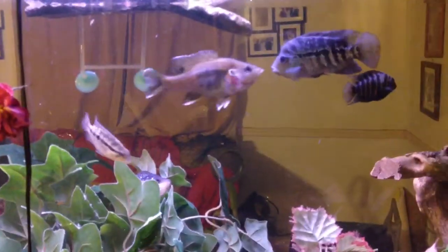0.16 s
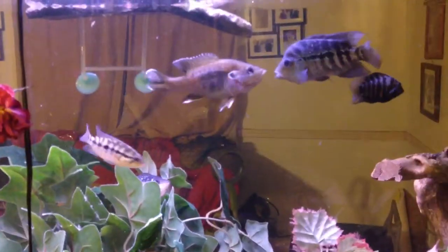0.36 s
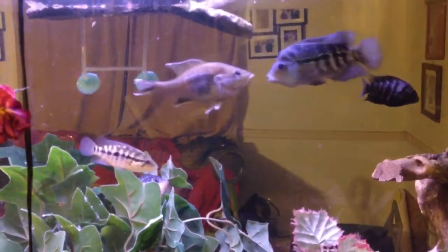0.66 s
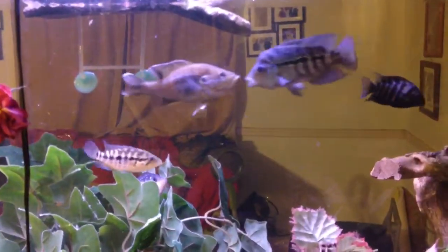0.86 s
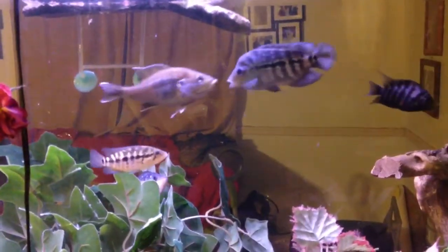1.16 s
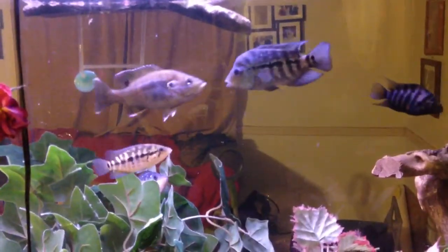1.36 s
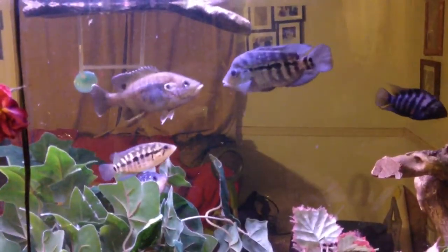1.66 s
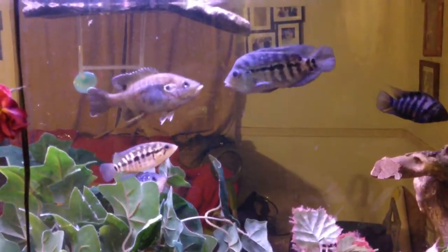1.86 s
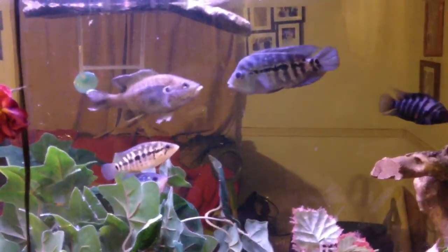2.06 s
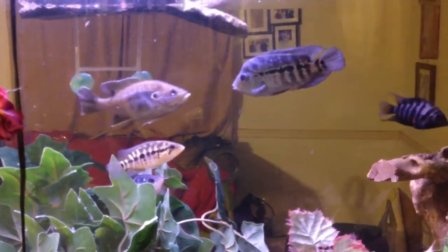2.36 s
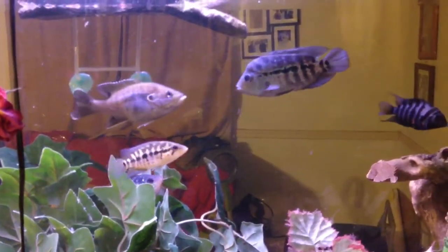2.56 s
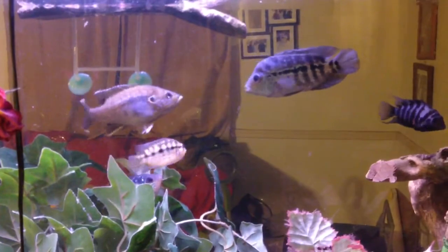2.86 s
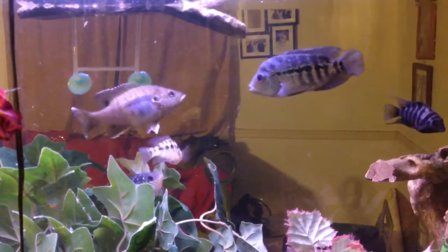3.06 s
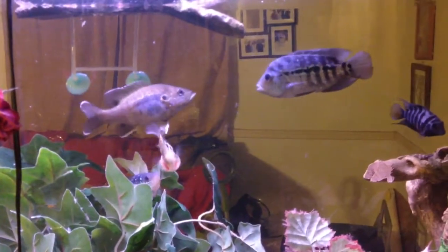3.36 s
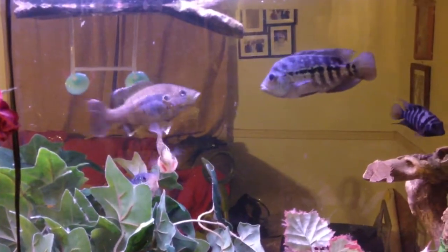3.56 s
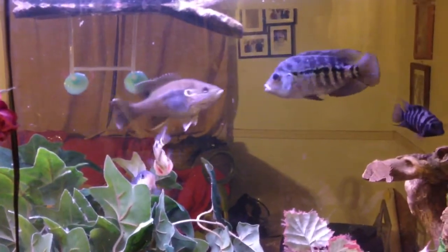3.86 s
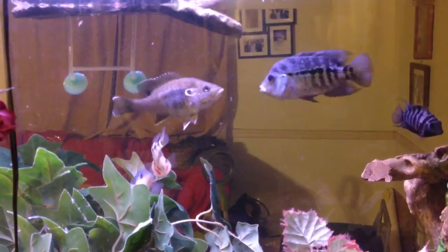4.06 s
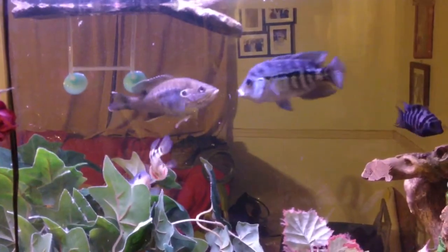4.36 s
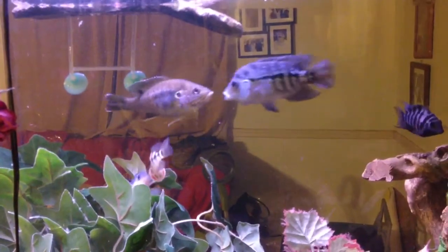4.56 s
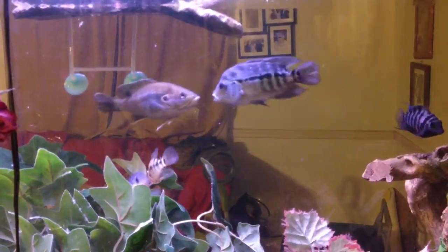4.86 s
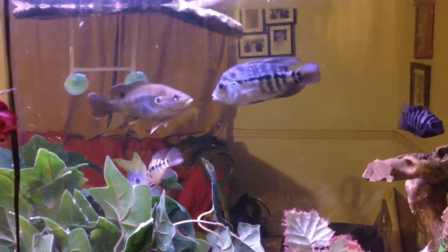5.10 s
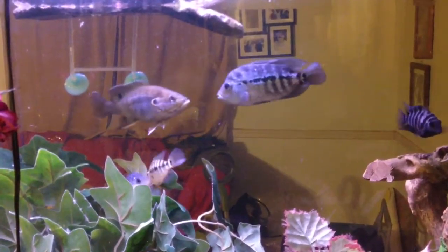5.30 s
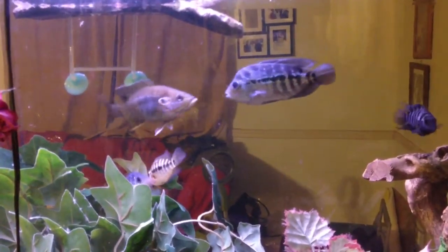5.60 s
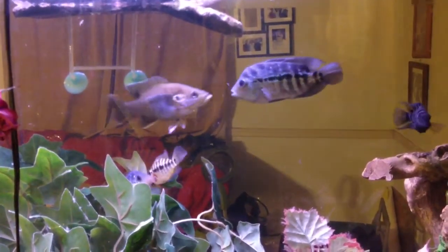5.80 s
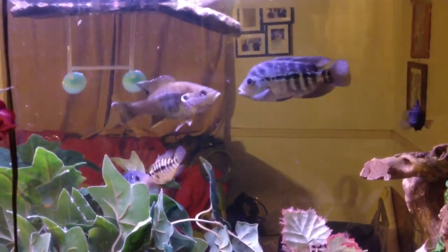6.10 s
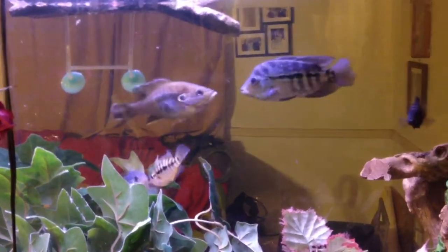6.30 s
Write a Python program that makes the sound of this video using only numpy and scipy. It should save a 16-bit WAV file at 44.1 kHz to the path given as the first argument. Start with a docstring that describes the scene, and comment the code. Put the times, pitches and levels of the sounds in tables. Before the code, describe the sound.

An aquarium trickles throughout, close to a small, bass-thin microphone in a lively room: swarms of tiny ringing bubbles, strongest around 2.4 kHz, uneven plops several times a second, fluttering spray hiss and a faint low pump hum. The flow swells briefly around 0.7 seconds. Light metallic clinks sound at 0.35 and 0.6. At about 1.4 a clink comes with a short, falling board groan; from 1.6 to 2.5 key-like metal clinks, jingles and rattles in quick shoves over a board. Duller scrapes follow at 2.7 to 2.9, and another clink and scrape at 3.35. Then mostly water, with bright droplet ticks, until 5.5, when a heavy clatter bursts out: two woody knocks, hard metallic cracks and rough dragging, strongest from 5.58 to 5.7, settling by 5.9. Water continues with a few faint clinks to the end at 6.4.

```python
"""Aquarium trickle and shuffled metal

Water trickles into a home aquarium: swarms of ringing bubbles, loudest near 2.4 kHz, with louder plops,
hissing spray, noisy droplet ticks and a pump hum. Elsewhere in the room small metal things, keys perhaps,
clink (noise cracks and ringing modes) and rattle (dense tiny contacts) as they are dragged over a board,
once with a heavy clatter. A lively room adds a dying noise tail; a small microphone thins the bass.
"""
import sys
import numpy as np
from scipy import signal
from scipy.fft import rfft, irfft
from scipy.io import wavfile
from scipy.ndimage import uniform_filter1d

SR = 44100
rng = np.random.default_rng(int(sys.argv[2]) if len(sys.argv) > 2 else 0)


def digitize_waveform(pressure):
    """Quantize a signal to 16-bit integers and store it at the path in sys.argv[1].

    Rows of a 2-D input are taken as channels; values are limited to [-1, 1].
    """
    field = np.atleast_2d(pressure).T
    bounded = np.clip(field, -1, 1)
    quanta = np.round(bounded * 32767).astype(np.int16)
    wavfile.write(sys.argv[1], SR, quanta)


N = 284004  # length [samples]


def from_db(db):
    """Gain of a level in dB."""
    return 10 ** (np.asarray(db) / 20)


def rms_one(x):
    """Scale a sound to rms 1."""
    return x / np.sqrt(np.mean(x ** 2) + 1e-20)


def level_curve(rows):
    """Read a (time, level) table at every sample, in dB."""
    times, levels = np.transpose(rows)
    return np.interp(np.arange(N) / SR, times, levels)


def at_hz(points, hz):
    """Read a table of values by frequency on a log-frequency axis."""
    table_hz, values = np.transpose(points)
    return np.interp(np.log(hz), np.log(table_hz), values)


def drift(rate_hz):
    """A slow random curve of rms 1: noise smoothed by two equal low-pass poles at the rate."""
    step = 40  # samples between the points of the curve
    r = np.exp(-2 * np.pi * rate_hz * step / SR)
    noise = rng.standard_normal(N // step + 2002)
    slow = signal.lfilter([1], [1, -2 * r, r * r], noise)[2000:]  # skip the filter's start
    return np.interp(np.arange(N) / step, np.arange(len(slow)), rms_one(slow))


def colour(x, spectrum):
    """Filter causally (minimum phase) with a given spectrum, folding its cepstrum forward in time."""
    gains = from_db(at_hz(spectrum, np.linspace(1, SR / 2, 2049)))
    cepstrum = irfft(np.log(gains))
    cepstrum[1:2048] *= 2
    cepstrum[2049:] = 0
    impulse_response = irfft(np.exp(rfft(cepstrum)))
    return signal.fftconvolve(x, impulse_response)[:N]


def resonance(x, hz, width_hz):
    """A two-pole band-pass with a gain of about 1 on top."""
    r = np.exp(-np.pi * width_hz / SR)
    zeros = np.array([1, 0, -1]) * (1 - r * r) / 2
    poles = [1, -2 * r * np.cos(2 * np.pi * hz / SR), r * r]
    return signal.lfilter(zeros, poles, x)


def grains(per_s, spread_db):
    """Random clicks of either sign; the spread makes their sizes uneven."""
    size_db = spread_db * np.minimum(rng.exponential(1, N), 5)
    clicks = from_db(size_db) * rng.choice([-1, 1], N)
    return clicks * (rng.random(N) < per_s / SR)


def add(out, s, sound):
    """Mix a short sound in at a time."""
    i = int(s * SR)
    out[i:i + len(sound)] += sound[:N - i]


def bubble(hz, cycles, rise, swell_s, roundness=1):
    """A bubble swells quickly, rings down 60 dB in some cycles and glides in pitch."""
    t = np.arange(int(1.5 * cycles / hz * SR)) / SR
    age = t * hz / cycles
    shape = (1 - np.exp(-t / swell_s)) ** 2 * from_db(-60 * age ** roundness)
    return shape / shape.max() * np.sin(2 * np.pi * hz * t * (1 + rise * age))


# how strongly the water runs: (time [s], level [dB])
STREAM_LEVEL = [(0, -44.5), (.66, -38), (1.2, -44.5), (2.55, -41.5), (3.0, -41), (3.6, -42), (3.83, -40.5),
                (4.28, -43), (5.24, -41.5), (6.44, -41.5)]
# loudness of bubbles by pitch: (pitch [Hz], relative level [dB per Hz])
BUBBLE_SPECTRUM = [(290, -72), (500, -76), (734, -12), (976, -10.5), (1240, -2), (1390, -14), (1750, 0.5),
                   (1990, -6.5), (2390, 7.5), (2700, -8.5), (3050, -30), (3510, -17), (4350, -25),
                   (5860, -27), (7470, -21), (10200, -56), (15000, -59)]
SMALL_GLIDE = 0.13  # spread of the pitch glides


def trickle():
    """Bubbles of all sizes are born in clumps where the stream enters; the smallest ring only a few ms."""
    born = grains(3300 * from_db(4.5 * drift(18)), spread_db=4.5)
    pitches = np.geomspace(600, 12000, 70)
    dealt = rng.integers(0, 70, N)  # which pitch a bubble born at each sample gets
    out = np.zeros(N)
    for k, hz in enumerate(pitches):
        cycles = 24.0 if hz < 3300 else 45.0
        glide = 0.028 + SMALL_GLIDE * rng.standard_normal()
        one = rms_one(bubble(hz, cycles, glide, swell_s=9.8 / hz, roundness=0.8))
        one = one * hz / np.sqrt(cycles)
        out += from_db(at_hz(BUBBLE_SPECTRUM, hz)) * signal.fftconvolve(born * (dealt == k), one)[:N]
    return from_db(level_curve(STREAM_LEVEL)) * rms_one(out)


# single bubbles that stand out: (time [s], level [dB], pitch [Hz])
PLOP_EVENTS = [(0.0552, -24, 2260), (0.059, -39, 1247), (.068, -25, 2210), (.152, -27, 1790),
               (0.187, -29, 2470), (0.1978, -22, 2520), (.2249, -17.5, 2390), (.4813, -32, 2200),
               (0.5118, -33, 2640), (.678, -40.5, 723), (0.887, -26.5, 2170), (0.306, -35, 1110),
               (0.332, -30, 1256), (0.3635, -21.5, 2400), (0.354, -38, 1060), (0.426, -37, 1160),
               (0.4282, -24.5, 2600), (0.454, -25, 2180), (.51, -41, 845), (0.56, -39, 990),
               (.63, -41, 1174), (.735, -27.5, 1840), (0.6511, -23, 2330), (.9388, -27, 2300),
               (1.019, -41.5, 1060), (1.039, -28, 2380), (1.193, -27, 1980), (1.2283, -29, 2600),
               (1.2402, -22, 2300), (1.2877, -28, 1850), (1.3072, -24.5, 2360), (1.3508, -18.5, 2300),
               (1.358, -36.5, 1240), (1.39, -39, 1270), (1.568, -33.5, 1060), (1.469, -38, 1190),
               (1.5703, -23, 2140), (1.8918, -33, 1800), (2.517, -47, 1000), (1.678, -31, 896),
               (1.729, -29.5, 1004), (1.953, -27.5, 2500), (2.0056, -23, 2450), (2.168, -18, 2420),
               (2.237, -34, 950), (2.6234, -30, 1990), (2.647, -21, 2350), (2.809, -26.5, 2560),
               (2.874, -24, 2490), (2.975, -22, 2690), (3.0257, -17, 2424), (3.122, -24.5, 2400),
               (3.1401, -24, 2270), (3.339, -20.5, 2870), (3.3625, -25, 2320), (3.3775, -20.5, 2280),
               (3.388, -23, 2320), (3.4013, -28, 2450), (3.4288, -24, 2330), (3.436, -18.5, 2540),
               (3.467, -33.5, 1070), (3.5309, -27, 2260), (3.684, -36.5, 1136), (3.711, -27, 2470),
               (3.768, -35, 1140), (3.8221, -21.5, 2350), (4.056, -26, 2420), (4.111, -24, 2290),
               (4.2076, -34, 1750), (4.229, -26, 2610), (4.365, -28, 2320), (4.42, -37, 2400),
               (4.5, -22, 2400), (4.59, -33, 1550), (4.65, -27.5, 1270), (4.7666, -28.5, 2290),
               (4.767, -41, 1115), (4.8034, -26.5, 2440), (4.9165, -22.5, 2450), (4.835, -26, 2390),
               (4.9034, -25, 2420), (4.969, -27, 2320), (5.115, -25, 2480), (5.1864, -20, 2440),
               (5.239, -32, 3310), (5.252, -22.5, 2380), (5.3374, -28.5, 2280), (5.3568, -26.5, 2450),
               (5.4883, -22.5, 2540), (5.786, -24, 2510), (5.909, -22, 2170), (6.031, -36, 1240),
               (6.0812, -22.5, 2350), (6.129, -24, 2700), (6.2012, -25.5, 2350), (6.26, -34, 3400),
               (6.332, -25, 2290), (6.3824, -26.5, 2350), (6.4243, -28, 2200)]
# ring length by pitch: (pitch [Hz], ring before a random spread [cycles])
PLOP_RING = [(1100, 24), (1800, 21)]
# attack by pitch: (pitch [Hz], swell time constant [s])
PLOP_SWELL = [(1100, 0.0008), (2300, 0.0011)]
PLOP_ROUND, PLOP_GLIDE = 1.9, 0.08  # over 1 a bubble holds, then dies quickly; spread of the pitch glides
PLOP_SPLASH_DB = -6.5  # before the splash is band-passed


def loud_bubbles():
    """Single bubbles, the deep ones ringing longer, with a splash from the drop and a near-wall echo."""
    out, splash = np.zeros(N), np.zeros(N)
    for s, db, hz in PLOP_EVENTS:
        cycles = at_hz(PLOP_RING, hz) * 2 ** (0.13 * rng.standard_normal())
        glide = PLOP_GLIDE * rng.standard_normal()
        one = from_db(db) * bubble(hz, cycles, glide, at_hz(PLOP_SWELL, hz), PLOP_ROUND)
        add(out, s, one)
        add(splash, s, np.abs(one) * rng.standard_normal(len(one)))
    splash_band = signal.butter(2, [800, 3600], "band", fs=SR, output="sos")
    out += from_db(PLOP_SPLASH_DB) * signal.sosfilt(splash_band, splash)
    add(out, .005, from_db(-8) * out.copy())  # the wall's echo
    return out


def spray():
    """Droplets too fine to ring alone fall in flurries: a hiss that comes and goes many times a second."""
    flurries = from_db(7.8 * drift(44) + 2.0 * drift(13.0))
    hiss = colour(rng.standard_normal(N), BUBBLE_SPECTRUM)
    return from_db(level_curve(STREAM_LEVEL) - 6.5) * rms_one(flurries * hiss)


# droplets that tick on the surface: (time [s], relative level [dB], pitch [Hz])
TICK_EVENTS = [(2.68, -30, 7400), (2.768, -32, 8800), (3.1963, -27.5, 7940), (3.2455, -36, 11900),
               (3.27, -37, 9400), (3.444, -30, 9200), (3.5604, -28.5, 4360), (3.6285, -27.5, 7750),
               (3.636, -35, 3700), (3.66, -34, 7200), (3.7065, -28.5, 7560), (3.734, -32, 5440),
               (3.774, -32, 7400), (3.7867, -25, 6750), (3.82, -37, 6900), (3.878, -37, 6000),
               (3.9, -40, 5400), (4.0249, -33, 7800), (4.228, -41.5, 7500), (4.309, -31.5, 7160),
               (4.7316, -29, 6760), (4.7886, -32, 7900), (4.801, -22.5, 4170), (4.894, -31, 7920),
               (4.916, -45, 9500), (5.06, -33, 7760), (5.335, -40, 11500), (5.247, -29.5, 7300),
               (5.358, -37, 8550), (5.4, -36, 8050), (5.448, -33, 3990), (6.0198, -34, 7910)]
TICK_RISE_S, TICK_T60_S, TICK_BROAD_DB = 0.0021, 0.028, -17.5
FAINT_TICKS = 110  # barely heard droplets at random times
FAINT_DB, FAINT_SPREAD_DB = -40, -3


def ticks():
    """Fine droplets hit the surface: short puffs of bright noise, strongest round each droplet's pitch."""
    out, t = np.zeros(N), np.arange(SR // 25) / SR
    luck = rng.random((FAINT_TICKS, 3))
    faint = [(a * N / SR, FAINT_DB + FAINT_SPREAD_DB * b, 4000 * 3.02 ** c) for a, b, c in luck]
    for s, db, hz in TICK_EVENTS + faint:
        envelope = (1 - np.exp(-t / TICK_RISE_S)) * from_db(-60 * t / TICK_T60_S)
        puff = rng.standard_normal(len(t)) * envelope
        broad = np.diff(puff, prepend=0) * from_db(TICK_BROAD_DB)
        pitched = resonance(puff, hz, width_hz=650) * from_db(8.5)
        add(out, s, from_db(db) * (broad + pitched))
    return signal.sosfilt(signal.butter(2, [3200, 12500], "band", fs=SR, output="sos"), out)


# metal on metal: (time [s], relative level [dB], favoured mode [Hz], ring over crack [dB])
CLINK_EVENTS = [(0.3452, -22, 4330, -3.5), (0.6062, -22.5, 5200, -5), (1.3698, -23.5, 7560, -7.5),
                (1.5861, -16, 7060, 0), (1.59, -30.5, 8410, 7), (1.585, -39.5, 12580, 23),
                (1.6469, -19.5, 7600, 1.5), (1.804, -20.5, 4080, -19), (1.943, -28, 14000, 0),
                (2.013, -21, 8100, 1), (2.035, -17, 7840, -4.5), (2.1078, -17.5, 4695, -1.5),
                (2.12, -27, 4800, 8), (2.132, -25, 4695, -4), (2.2477, -28, 7800, 1),
                (2.3283, -19.5, 9450, -1), (2.44, -24.5, 7200, -5), (2.26, -32, 4690, -1.5),
                (2.722, -28.5, 5000, -12), (2.919, -31.5, 4690, -7), (2.801, -21.5, 4500, -10),
                (3.12, -35.5, 4600, 1.5), (3.359, -20, 4600, -7.5), (3.37, -23.5, 5400, 4.5),
                (5.523, -26, 4730, 15), (5.534, -30, 4700, 8), (5.5531, -34, 4700, 13),
                (5.575, -8, 4700, -10.5), (5.586, -30, 4630, 9), (5.6272, -14.5, 5200, -8),
                (5.6721, -9.5, 4520, -15), (5.799, -23, 5170, -9), (6.0462, -32, 9100, -6),
                (6.0985, -31, 7700, -8), (6.278, -23, 7600, -0.5)]
# what the metal rings with: (mode [Hz], relative level [dB])
METAL_MODES = [(4250, -8.5), (4520, -5), (4600, -2.5), (4695, -2), (4790, -9), (5400, -4), (6880, -12),
               (7190, -3), (7830, -6.5), (8410, -1), (8660, -1), (9390, -3.5), (10300, -7), (12580, -14),
               (13400, -25), (13900, -30)]
# colour of cracks and rattle: (frequency [Hz], relative level [dB per Hz])
RATTLE_SPECTRUM = [(710, -55), (1200, -6.5), (1320, -9), (1710, -7.5), (2460, 6.5), (3510, -9.5),
                   (4210, -1.5), (4690, -1.5), (5050, -6), (5450, -0.5), (6190, -6), (7840, -3.5),
                   (11500, -16), (13600, -14.5), (15600, -22)]
# faint cracks are shorter: (clink level [dB], crack T60 [s])
CRACK_T60 = [(-38, .022), (-25, .09)]
CLINK_T60_S, CRACK_RISE_S = 0.1, .004
# the crack's top edge, brighter for pieces that ring higher; its level is for a favoured mode of 7 kHz
SIZZLE_DB, SIZZLE_DB_PER_OCTAVE = -13.5, 8.5


def clinks():
    """A crack of noise and ringing modes near the favoured one; loose contact detunes and wavers them."""
    rings, cracks, edges = np.zeros(N), np.zeros(N), np.zeros(N)
    t = np.arange(SR // 6) / SR
    hz, mode_db = np.transpose(METAL_MODES)
    for s, db, favoured_hz, ring_db in CLINK_EVENTS:
        luck = rng.standard_normal((3, len(hz)))  # detuning, phase and level of each mode
        near_db = -np.minimum(90 * np.abs(np.log2(hz / favoured_hz)), 23.0)
        sines = np.sin(2 * np.pi * (np.outer(t, hz * (1 + 0.00067 * luck[0])) + luck[1]))
        modes = sines @ from_db(mode_db + near_db + 2 * luck[2])
        waver = 1 + .25 * rms_one(uniform_filter1d(rng.standard_normal(len(t)), size=150))
        ring = modes * waver * from_db(ring_db - 60 * t / CLINK_T60_S)
        add(rings, s, from_db(db) * ring * (1 - np.exp(-t / 0.00072)))
        crack_t60_s = np.interp(db, *np.transpose(CRACK_T60))
        crack_shape = from_db(db - 60 * t / crack_t60_s) * (1 - np.exp(-t / CRACK_RISE_S))
        crack = crack_shape * rng.standard_normal(len(t))
        add(cracks, s, crack)
        sizzle_db = SIZZLE_DB + SIZZLE_DB_PER_OCTAVE * np.log2(favoured_hz / 7000)
        add(edges, s, from_db(sizzle_db) * crack)
    return rings + colour(cracks, RATTLE_SPECTRUM) + np.diff(edges, prepend=0)


# each shove of the metal across the board:
# (start [s], hold [s], rattle level [dB], drag level [dB], jingle level [dB])
SHOVE_EVENTS = [(1.351, 0.041, -46, -41.5, -48), (1.571, 0.067, -33, -44.5, -39),
                (1.667, 0.036, -39, -42.5, -54), (1.932, 0.045, -33, -42, -34),
                (1.991, 0.032, -29, -37, -34), (2.09, 0.16, -41, -56, -41), (2.23, 0.051, -34, -41, -38.5),
                (2.34, 0.074, -44.5, -51.5, -50), (2.439, 0.03, -38.5, -57, -43),
                (2.71, 0.15, -45, -39, -71), (2.787, 0.022, -32, -36.5, -68), (2.929, 0.066, -41, -42, -70),
                (3.349, 0.035, -32, -36.5, -65), (5.515, 0.022, -31.5, -30, -63),
                (5.588, 0.046, -32.5, -29.5, -39), (5.642, 0.043, -29.5, -24, -50),
                (5.69, 0.073, -36.5, -52, -41.5), (5.783, 0.038, -29.5, -30, -40),
                (5.855, 0.034, -34, -31, -56)]
SHOVE_RISE_S, RATTLE_FALL_DB_PER_S, DRAG_FALL_DB_PER_S = 0.012, 198, 190


def shoved(level_db, fall_db_per_s):
    """Power of a layer under the shoves: each swells, holds and falls away."""
    out, t = np.zeros(N), np.arange(SR // 2) / SR
    for (s, hold_s, *_), db in zip(SHOVE_EVENTS, level_db):
        after = np.maximum(t - SHOVE_RISE_S - hold_s, 0)
        swell = np.minimum(t / SHOVE_RISE_S, 1) ** 4
        add(out, s, swell * from_db(db - fall_db_per_s * after) ** 2)
    return out


# colour of the drag: (frequency [Hz], relative level [dB per Hz])
DRAG_SPECTRUM = [(35, -55), (60, -33.5), (246, -0.5), (403, -1.5), (439, -0.5), (577, -1.5), (650, -2.5),
                 (1010, 1), (1330, -6), (2410, 3), (3500, -30), (4550, -43), (7700, -120)]
# resonances of the board, also rung by the knocks: (frequency [Hz], width [Hz], relative level [dB])
BOARD_MODES = [(444.4, 6.4, 0), (656, 9.3, -6.5), (751, 22, -3), (1070, 42, -11.5)]
# the faint rustle between shoves, before its trim and drift: (time [s], level [dB])
RUSTLE_LEVEL = [(0, -42), (.22, -50), (.62, -43.5), (.82, -39.5), (1.5, -42), (1.8, -47), (2.6, -53.5),
                (4.2, -55.5), (5.0, -53), (6.44, -52)]
RUMBLE_DB = -50.5  # the board is never quite still
JINGLE_HZ = 8620  # the smallest pieces jingle above this, the rattle stays below


def shuffle():
    """Dense tiny contacts make rattle and jingle; the drag is rough noise in the board's resonances."""
    contacts = colour(grains(6000 * from_db(4.1 * drift(45)), spread_db=0.0), RATTLE_SPECTRUM)
    rub = grains(3000, spread_db=3.0)
    board_ring = sum(from_db(db) * resonance(rub, hz, width_hz) for hz, width_hz, db in BOARD_MODES)
    drag = colour(rub + from_db(4.5) * board_ring, DRAG_SPECTRUM)
    # the pieces ring on, by turns
    metal_ring = sum(from_db(db - 4.0 + 8.4 * drift(17.7)) * resonance(contacts, hz, width_hz=53)
                     for hz, db in METAL_MODES)
    contacts = contacts + metal_ring
    jingle = signal.sosfilt(signal.butter(4, JINGLE_HZ, "high", fs=SR, output="sos"), contacts)
    body = signal.sosfilt(signal.butter(2, JINGLE_HZ, fs=SR, output="sos"), contacts)

    _, _, rattle_db, drag_db, jingle_db = np.transpose(SHOVE_EVENTS)
    rustle = from_db(level_curve(RUSTLE_LEVEL) - 0.95 + 2.27 * drift(7.8))
    # powers add, so each layer fades into its quiet bed
    rattle_gain = np.sqrt(shoved(rattle_db, RATTLE_FALL_DB_PER_S) + rustle ** 2)
    jingle_gain = np.sqrt(shoved(jingle_db, RATTLE_FALL_DB_PER_S) + (from_db(-9.0) * rustle) ** 2)
    drag_gain = np.sqrt(shoved(drag_db, DRAG_FALL_DB_PER_S) + from_db(RUMBLE_DB) ** 2)
    return rattle_gain * rms_one(body) + jingle_gain * rms_one(jingle) + drag_gain * rms_one(drag)


# something heavier lands on the board: (time [s], relative level [dB])
KNOCK_EVENTS = [(5.523, -24.5), (5.578, -23.5)]


def knocks():
    """Each knock rings the board's modes, which die at a rate set by their widths."""
    out, t = np.zeros(N), np.arange(SR // 3) / SR
    for s, db in KNOCK_EVENTS:
        modes = sum(from_db(mode_db) * np.exp(-np.pi * width_hz * t) * np.sin(2 * np.pi * hz * t)
                    for hz, width_hz, mode_db in BOARD_MODES)
        add(out, s, from_db(db) * modes * (1 - np.exp(-t / 0.0014)))
    return out


GROAN_S, GROAN_LENGTH_S, GROAN_DB = 1.36, .11, -42  # level before the roughness
GROAN_HZ, GROAN_FALL_OCTAVES = 540, 1.4


def groan():
    """A short groan of the board: a falling tone, roughened by random changes of loudness."""
    out, t = np.zeros(N), np.arange(SR // 3) / SR
    along = np.minimum(t / GROAN_LENGTH_S, 1)
    rough = .55 + rms_one(uniform_filter1d(rng.standard_normal(len(t)), size=200))
    phase = 2 * np.pi * np.cumsum(GROAN_HZ * 2 ** (-GROAN_FALL_OCTAVES * along)) / SR
    add(out, GROAN_S, from_db(GROAN_DB) * np.sin(np.pi * along) * rough * np.sin(phase))
    return out


PUMP_HZ, PUMP_DB = 120.3, -64
# the tank's lid buzzing with the pump: (frequency [Hz], width [Hz], level [dB])
LID_DRONE = [(275.7, 17, -68.5), (441.7, 11.5, -60), (715, 14, -63)]


def pump():
    """A mains hum that wavers a little in level, and narrow bands of noise as drone."""
    tone = np.sqrt(2) * np.sin(2 * np.pi * PUMP_HZ * np.arange(N) / SR)
    hum = from_db(PUMP_DB + 1.0 * drift(0.71)) * tone
    drone = sum(from_db(db) * rms_one(resonance(rng.standard_normal(N), hz, width_hz))
                for hz, width_hz, db in LID_DRONE)
    return hum + drone


ROOM_T60_S, WALL_CUT_HZ = 0.36, 640


def room(x):
    """Dense echoes: a dying noise tail whose treble dies sooner."""
    t = np.arange(int(.6 * SR)) / SR
    noise = rng.standard_normal(len(t))
    dull = signal.sosfilt(signal.butter(1, WALL_CUT_HZ, fs=SR, output="sos"), noise)
    bright = noise - dull
    tail = dull * from_db(-60 * t / ROOM_T60_S) + bright * from_db(-60 * t / (0.43 * ROOM_T60_S))
    tail *= t > .004  # the first wall is about a metre further
    return signal.fftconvolve(x, tail / np.sqrt(np.sum(tail ** 2)))[:N]


# colour of the background noise: (frequency [Hz], relative level [dB per Hz])
FLOOR_SPECTRUM = [(15, -106), (25, -53), (59, -29), (116, -4), (350, -6), (446, -12), (616, -66), (724, 4),
                  (851, -54), (1270, -34), (1380, -68), (2370, 4.5), (3270, -20.5), (7950, -35),
                  (15600, -24)]
ROOM_NOISE_DB = -52


def room_noise():
    """The steady background of the room: coloured noise."""
    return from_db(ROOM_NOISE_DB) * rms_one(colour(rng.standard_normal(N), FLOOR_SPECTRUM))


def scene():
    """Water and metal in one room, the metal sounding drier."""
    water = trickle() + spray() + ticks() + loud_bubbles()
    metal = clinks() + shuffle() + knocks() + groan()
    wet = room(from_db(-6.5) * water + from_db(-13.5) * metal)
    return (water + metal + wet + pump() + room_noise())[None]


CUTOFF_HZ = 15900


def record(dry):
    """The small capsule loses the deep bass; the top is cut."""
    thin = signal.sosfilt(signal.butter(1, 70, "high", fs=SR, output="sos"), dry)
    return signal.sosfilt(signal.cheby2(14, 70, CUTOFF_HZ, fs=SR, output="sos"), thin)


dry = scene()
out = record(dry)
digitize_waveform(out)
```